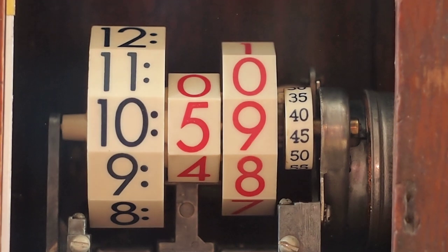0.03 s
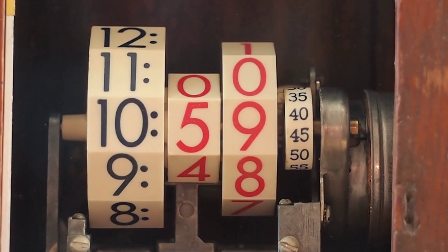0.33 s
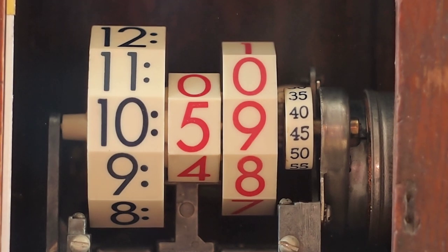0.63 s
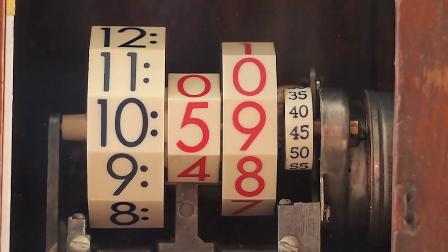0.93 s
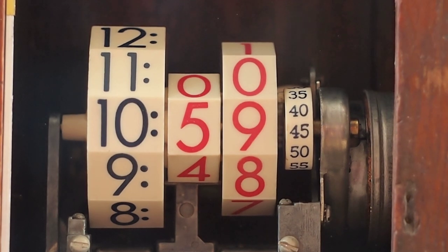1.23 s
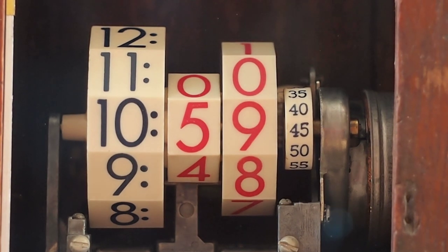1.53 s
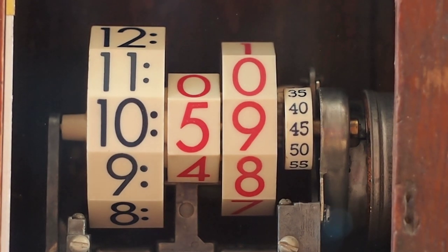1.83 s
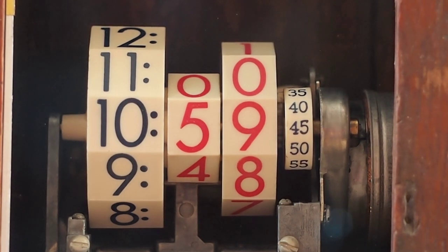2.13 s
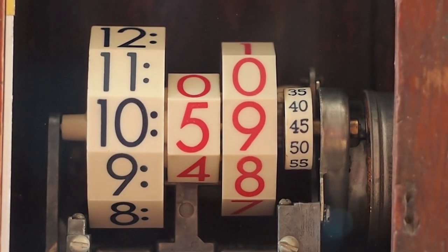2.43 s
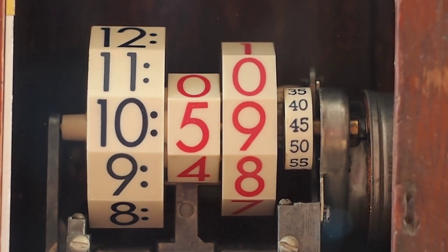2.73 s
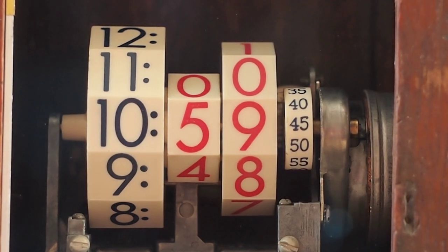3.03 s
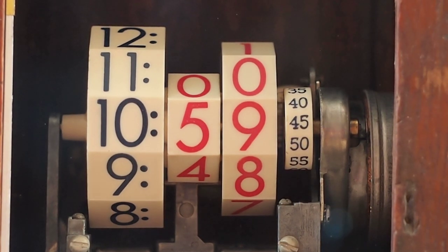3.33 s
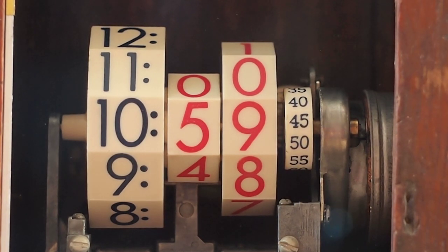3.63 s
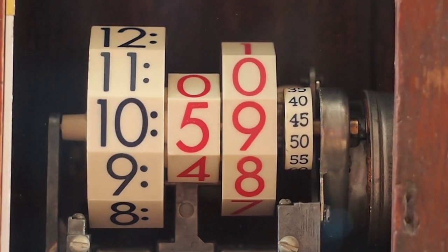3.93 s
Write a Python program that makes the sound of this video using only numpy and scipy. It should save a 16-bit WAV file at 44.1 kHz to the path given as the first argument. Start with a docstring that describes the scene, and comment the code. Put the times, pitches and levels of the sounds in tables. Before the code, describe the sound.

An electric clock motor rattles quickly and evenly over a woody hum, with one double tick.

```python
"""A quick, even rattle over a woody hum: the motor of a drum-dial electric clock, close by in a quiet room.
Each turn of a gear, 7.5 a second, gives the same short run of tooth contacts, which rings the metal works
and sets the wooden case humming. Early on, a faint tick and then one sharp double tick snap from the works.
Soft low knocks, faint passing whines, room rumble and an even hiss lie behind."""
import sys
import numpy as np
from scipy import signal
from scipy.fft import rfft, irfft
from scipy.io import wavfile

SR = 44100
rng = np.random.default_rng(int(sys.argv[2]) if len(sys.argv) > 2 else 0)


def store_pcm(level_fs):
    """Save levels as 16-bit WAV."""
    pcm = np.round(np.clip(level_fs, -1, 1) * 32767).astype(np.int16)
    wavfile.write(sys.argv[1], SR, np.atleast_2d(pcm).T)


N = 176400
TIME = np.arange(N) / SR


def from_db(db):
    """Decibels to gain."""
    return 10 ** (np.asarray(db) / 20)


def clicks(times, forces):
    """One click of the given force at each time."""
    out = np.zeros(N)
    inside = (times >= 0) & (times < (N - 1) / SR)
    np.add.at(out, np.round(times[inside] * SR).astype(int), forces[inside])
    return out


def ring(hits, modes):
    """Clicks set decaying sines ringing; neighbouring modes swing in opposite directions."""
    out = np.zeros(N)
    for k, (hz, db, t60) in enumerate(modes):
        decay = np.exp(-np.log(1000) / (t60 * SR))
        angle = 2 * np.pi * hz / SR
        mode = signal.lfilter([0, np.sin(angle)], [1, -2 * decay * np.cos(angle), decay ** 2], hits + 1e-18)
        out += (-1) ** k * from_db(db) * mode
    return out


def noise(spectrum):
    """Noise shaped to the given level per Hz."""
    hz, db = np.transpose(spectrum)
    bins_hz = np.maximum(np.fft.rfftfreq(N, 1 / SR), 1)
    eq = from_db(np.interp(np.log(bins_hz), np.log(hz), db))
    return irfft(rfft(rng.standard_normal(N)) * eq, N) * np.sqrt(SR / 2)


def drift(rate_hz):
    """A smooth random wobble with a spread of one."""
    rolloff = 1 + (np.fft.rfftfreq(N, 1 / SR) / rate_hz) ** 2
    wobble = irfft(rfft(rng.standard_normal(N)) / rolloff, N)
    return wobble / wobble.std()


def room(x, t60_s=.3):
    """The short, diffuse reverb tail of the room, at unit energy."""
    tail = rng.standard_normal(SR // 2) * np.exp(-np.log(1000) * TIME[:SR // 2] / t60_s)
    return signal.fftconvolve(x, tail / np.linalg.norm(tail))[:N]


def motor(turn_s=.1333603, first_turn_s=.24164, spread_db=.1, mains_hz=120):
    """The same tooth contacts on every turn ring the works and the case, over a faint mains hum."""
    # tooth contacts within one turn: offset_s, force (negative = the tooth falls back)
    contacts = [(0.001184, 0.5491), (0.008731, 1.017), (0.01701, 1.321), (0.02532, 0.3742),
                (0.07932, -0.4526)]
    # bright, short modes of the metal works: pitch_hz, relative_db, t60_s
    works_modes = [(920, -51, 0.022), (1245.7, -36.5, 0.029), (1250, -30.5, .017), (1554, -24.5, .0026),
                   (1753, -30.5, 0.0098), (1960, -52, 0.039), (2280, -59, 0.003), (3066, -45.5, 0.025),
                   (3244, -37.5, 0.0073), (3690, -63, 0.0068), (3970, -55.5, 0.023)]
    # low, lingering modes of the wooden case: pitch_hz, relative_db, t60_s
    case_modes = [(253.8, -47.5, 0.37), (270.5, -47, 0.18), (351.7, -61.5, 0.12), (400, -55, 0.56),
                  (505.7, -53, 0.17), (532.6, -58.5, 0.17)]
    # early reflections off the case and nearby surfaces: delay_s, gain
    reflections = [(0.004205, 0.2818), (0.006723, 0.1758), (0.008709, -0.1253), (0.01021, -0.4712),
                   (0.01575, 0.2686), (0.01872, 0.1821), (0.02611, -0.2983), (0.02752, -0.269),
                   (0.03118, -0.217), (0.03541, 0.2701)]
    offset_s, force = np.transpose(contacts)
    turns = first_turn_s + turn_s * np.arange(-1, N / SR / turn_s)
    forces = force * from_db(-spread_db * rng.standard_normal((len(turns), len(force))))
    hits = clicks((turns[:, None] + offset_s).ravel(), forces.ravel())
    works = from_db(1.5) * ring(hits, works_modes)
    echoes = sum(gain * np.interp(TIME - delay, TIME, works, left=0) for delay, gain in reflections)
    case = from_db(-.5) * ring(hits, case_modes)
    mains = from_db(-61) * np.sqrt(2) * np.sin(2 * np.pi * mains_hz * TIME)
    return works + echoes + from_db(-10) * room(works) + case + mains


def room_tone(flicker_db=.43):
    """A bed of even, barely flickering hiss over a rumble that swells and sinks."""
    # steady room noise and hiss: frequency_hz, level_db_per_hz
    air_spectrum = [(20, -77), (60, -88.5), (110, -74.5), (200, -72), (330, -74.5), (470, -77),
                    (580, -81.5), (1000, -83), (1850, -86.5), (2200, -89), (2900, -90.5), (3200, -92),
                    (3700, -93.5), (4800, -97.5), (5800, -96.5), (6500, -92.5), (7200, -99), (8500, -97.5),
                    (10500, -95.5), (15500, -94)]
    # low rumble ahead of its swells: frequency_hz, level_db_per_hz
    rumble_spectrum = [(10, -70), (28, -72), (55, -69), (80, -69.5), (130, -79), (400, -115)]
    # swells of the rumble: time_s, gain_db
    swell_curve = [(.2, -1), (.45, -1.5), (.58, 3.5), (.7, -0.5), (1.05, -1.5), (1.28, -3), (1.6, 5),
                   (1.8, -1.5), (1.95, 1.5), (2.1, -0.5), (2.25, 2), (2.52, -3.5), (2.7, -0.5),
                   (3.15, -3.5), (3.3, 5.5), (3.45, -2), (4, 1.5)]
    air = noise(air_spectrum) * from_db(flicker_db * drift(rate_hz=15))
    swell = from_db(np.interp(TIME, *np.transpose(swell_curve)))
    return air + noise(rumble_spectrum) * swell


def ticks():
    """A small part snaps and rings for a few milliseconds, with a touch of room."""
    # sharp snaps from the works: start_s, level_db, pitch_hz
    snaps = [(.3935, -46, 7200), (.6841, -33.5, 6900), (.7047, -28, 6200)]
    # modes of the snapping part: pitch_ratio, relative_db, t60_s
    tick_modes = [(.37, -9.5, .009), (.6, -13, .005), (.87, -7.5, .006), (1.02, -3.5, .007),
                  (1.2, -8, .005), (1.58, -11, .004), (2.4, -13, .002)]
    out = np.zeros(N)
    for start_s, level_db, pitch_hz in snaps:
        modes = [(pitch_hz * ratio, db, t60) for ratio, db, t60 in tick_modes]
        out += ring(clicks(np.array([start_s]), from_db([level_db])), modes)
    return out + from_db(-9) * room(out)


def knocks(pitch_hz=340, attack_s=.004, t60_s=.13):
    """Dull knocks on one low note, each with a soft attack."""
    # soft low knocks: start_s, level_db
    cues = [(.438, -37), (.946, -34), (1.447, -37.5), (1.785, -34.5), (2.289, -36), (2.792, -34.5),
            (3.132, -37), (3.639, -35.5), (3.872, -36.5)]
    out = np.zeros(N)
    for start_s, level_db in cues:
        age = np.maximum(TIME - start_s, 0)
        envelope = (1 - np.exp(-age / attack_s)) * np.exp(-np.log(1000) * age / t60_s)
        out += from_db(level_db) * envelope * np.sin(2 * np.pi * pitch_hz * age)
    return out


def whines(waver_depth=.0029, waver_hz=60.3, fade_s=.0086):
    """Faint wavering tones come and go just above the hiss."""
    # passing tones: start_s, length_s, pitch_hz, rise_hz_per_s, level_db
    tones = [(.75, 0.14, 6228, 0, -69), (.75, 0.12, 6500, 0, -67), (.76, .12, 7650, 0, -73),
             (0.758, .1, 9324, 0, -72), (0.982, 0.114, 479, 304, -52), (1.934, .05, 6700, 0, -64),
             (2.146, .13, 9500, 0, -65), (2.15, 0.12, 7300, 0, -69), (2.15, 0.72, 6480, -3, -71)]
    out = np.zeros(N)
    for start_s, length_s, pitch_hz, rise, level_db in tones:
        age = TIME - start_s
        glide_hz = pitch_hz + rise * np.clip(age, 0, length_s)
        wavering_hz = glide_hz * (1 + waver_depth * drift(waver_hz))
        envelope = np.clip(np.minimum(age, length_s - age) / fade_s, 0, 1)
        out += from_db(level_db) * np.sqrt(2) * envelope * np.sin(2 * np.pi * np.cumsum(wavering_hz) / SR)
    return out


def scene():
    """The clock and its room, mixed dead centre."""
    mono = motor() + room_tone() + ticks() + knocks() + whines()
    return np.array([mono, mono])


def record(dry, start_s=.1988, fade_from_db=-4.5, fade_s=.12, notch_hz=7920, cutoff_hz=15800):
    """After a short silence the sound eases up to level; the treble has a narrow notch and a steep top cut."""
    fade_db = fade_from_db * np.clip(1 - (TIME - start_s) / fade_s, 0, 1)
    faded = dry * (TIME >= start_s) * from_db(fade_db)
    notched = signal.lfilter(*signal.iirnotch(notch_hz, Q=37, fs=SR), faded)
    high_cut = signal.ellip(12, .1, 70, cutoff_hz, fs=SR, output="sos")
    return signal.sosfilt(high_cut, notched)


dry = scene()
out = record(dry)
store_pcm(out)
```